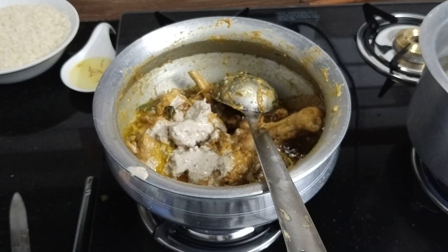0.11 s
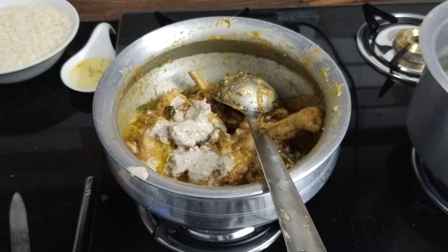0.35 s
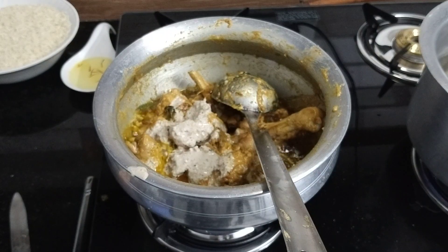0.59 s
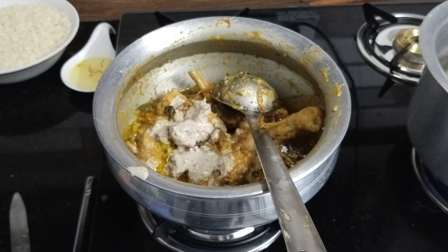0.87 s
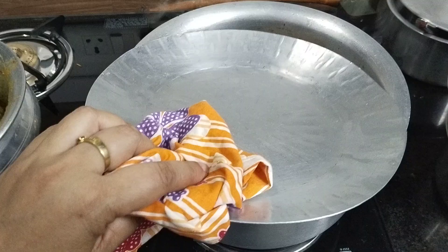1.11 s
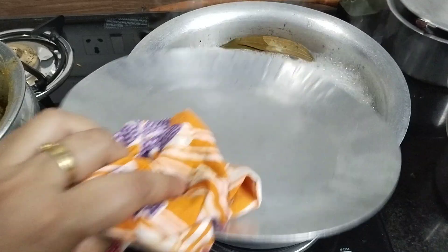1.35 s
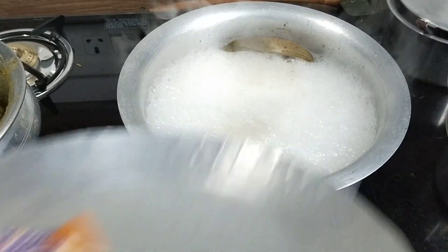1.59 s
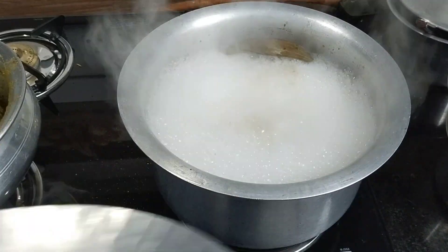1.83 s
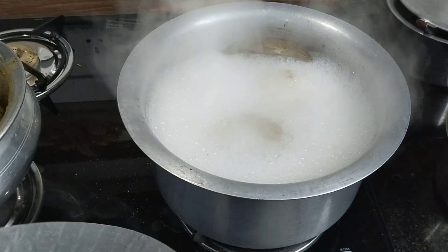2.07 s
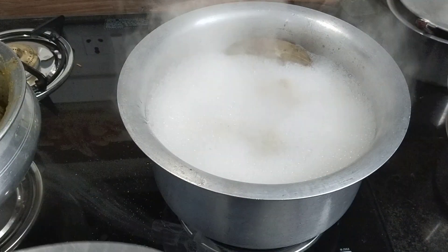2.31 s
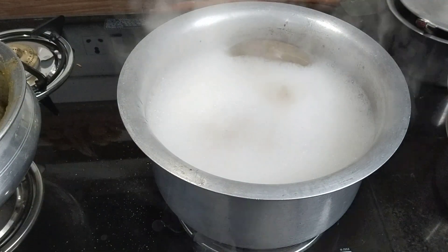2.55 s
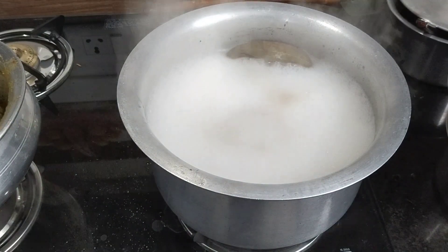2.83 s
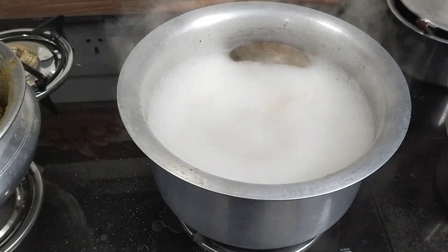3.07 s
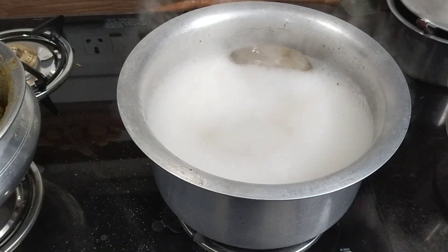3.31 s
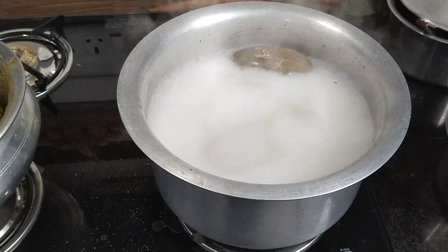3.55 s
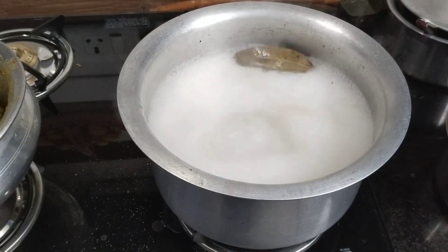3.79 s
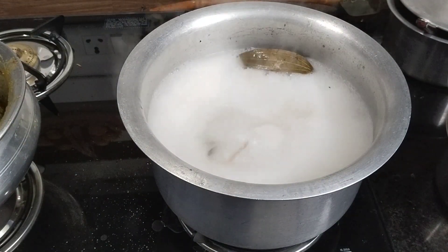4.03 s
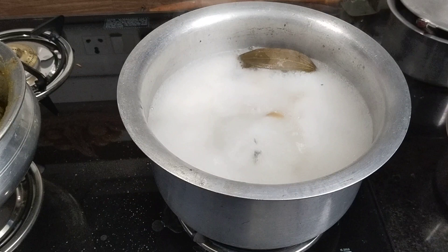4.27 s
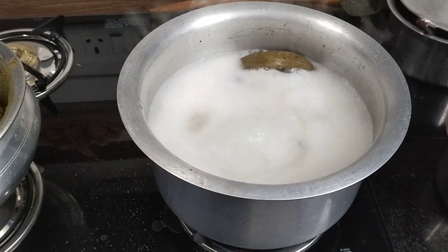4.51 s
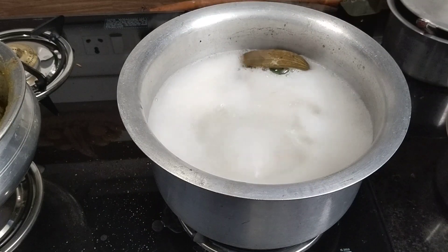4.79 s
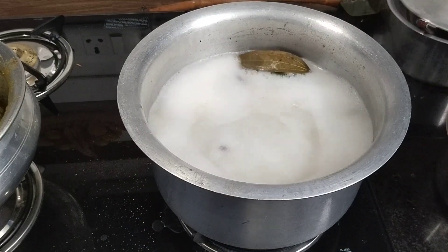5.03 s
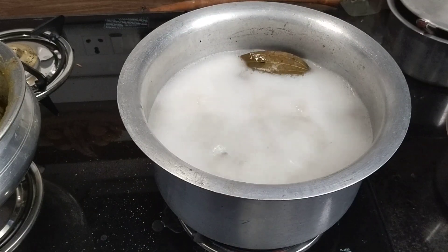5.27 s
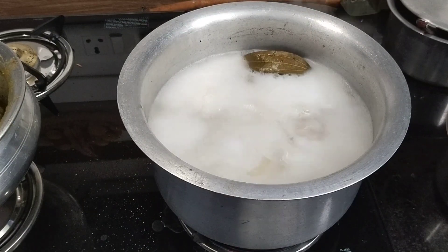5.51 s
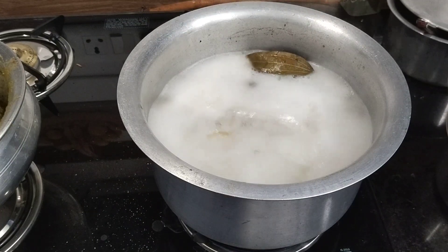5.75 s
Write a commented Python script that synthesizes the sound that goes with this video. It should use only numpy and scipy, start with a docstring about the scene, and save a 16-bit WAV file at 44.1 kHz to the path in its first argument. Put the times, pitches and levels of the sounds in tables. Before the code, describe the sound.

A close stereo microphone hears a quiet tiled kitchen with a short, bright reverberation. From 0 to 1.2 s, small wet plops, ticks and crackles rise in pitch from a simmering pot over faint flickering burner hiss and a wavering low hum. Around 1.2-1.7 s a thin aluminium lid drags off the rim, swelling into a hollow, gritty, ringing midrange scrape that peaks near 1.55 s. The boil then thins; a soft knock comes at 2.0 s, a bright clink at 2.26 s, and gentle brushes and ticks until 3.4 s. At 3.74-3.86 s the lid taps lightly on stone, then knocks sharply at 4.02 s. After a near pause, it drops at 4.75 s, by far the loudest moment, with repeated bright clanks and right-sided jolts to 4.9 s, sliding and ringing until about 5.2 s. A soft brush and small knock at 5.5 s close over faint hiss.

```python
"""Food plops in a simmering pot; then a thin aluminium lid is dragged off its rim, eased onto a stone counter,
knocked, dropped and slid, in a tiled kitchen. Ticks, knocks, a bright clink, burner hiss and a wavering hum
fill the pauses. The lid is grit clicks convolved with decaying plate modes; bubbles are short resonators, ticks
decaying sines, knocks and brushes shaped noise bursts, hiss noise in flickering bands, hum two sines.
Bubbles, ticks and lid ring in the room; hiss, hum, knocks, brushes and jolts are added dry."""
import sys
import numpy as np
from scipy import signal
from scipy.fft import rfft
from scipy.io import wavfile
from scipy.ndimage import uniform_filter1d

SR = 44100
rng = np.random.default_rng(int(sys.argv[2]) if len(sys.argv) > 2 else 0)


def waveform_to_disk(signal):
    """Save audio, clipped to [-1, 1], as 16-bit WAV at the path in sys.argv[1]."""
    frames = np.transpose(np.atleast_2d(signal))
    scaled = np.clip(frames, -1, 1) * 32767
    samples = np.round(scaled).astype(np.int16)
    wavfile.write(sys.argv[1], SR, samples)


def boost(x):
    """Linear amplitude factor 10**(x/20) for a level x in decibels (scalar or array-like)."""
    u = np.asarray(x, float) / 20
    return 10 ** u


N = 259308

# Left-right likeness of diffuse sound. Each row: frequency in Hz, likeness (1 = same on both sides).
LIKENESS = [(60, 0.91), (180, 1), (550, 0.45), (1650, 0.11), (4970, 0.093), (15000, 0.08)]
EDGES_HZ = 40 * 2 ** np.arange(0, 9.1, 0.5)  # half-octave bands
STOVE_LAG_S, COUNTER_LAG_S = 0.0001, 0.0004  # direct sound, left after right


def rms_one(x):
    """Scale to rms 1."""
    return x / np.sqrt(np.mean(x ** 2) + 1e-20)


def at_hz(points, hz):
    """Read a table on a log-frequency axis."""
    table_hz, values = np.array(points).T[:2]
    return np.interp(np.log(hz), np.log(table_hz), values)


def band(x, low_hz, high_hz):
    """Band-pass."""
    return signal.sosfilt(signal.butter(2, [low_hz, high_hz], "band", fs=SR, output="sos"), x)


def drift(rate_hz):
    """Slow random wander, rms 1: noise through two equal poles, one point per 40 samples."""
    r = np.exp(-80 * np.pi * rate_hz / SR)
    slow = signal.lfilter([1], [1, -2 * r, r * r], rng.standard_normal(N // 40 + 2002))[2000:]
    return np.interp(np.arange(N) / 40, np.arange(len(slow)), rms_one(slow))


def through(x, response):
    """Convolve each side with its response."""
    return signal.fftconvolve(np.atleast_2d(x), response, axes=1)[:, :N]


def stereo(mid, side, alike):
    """Mix two independent noises into left and right of a given likeness."""
    return np.sqrt(1 + alike) * mid + np.sqrt(1 - alike) * side * [[1], [-1]]


def kitchen(wet_db, left_lag_s):
    """Stereo room response: direct sound, later on the left, then a noise tail dying band by band."""
    # Each row: frequency in Hz, decay time t60 in s.
    room_t60 = [(150, 0.4), (1000, 0.62), (4000, 0.63), (14000, 0.36)]
    t = np.arange(SR * 3 // 4) / SR
    white = rng.standard_normal((2, 2, len(t)))
    tail = 0
    for k, (low, high) in enumerate(zip(EDGES_HZ, EDGES_HZ[1:])):
        decay = boost(-60 * t / at_hz(room_t60, np.sqrt(low * high)))
        tail = tail + band(white[k % 2], low, high) * decay
    tail *= np.clip(t / 0.0033, 0, 1)  # first reflections need a few ms
    response = boost(wet_db) * tail / np.sqrt(np.sum(tail ** 2) / 2)
    response[0, round(left_lag_s * SR)] += 1
    response[1, 0] += 1
    return response


def hum():
    """Mains hum at 100 Hz that swells and fades, and a steadier octave; both waver in pitch and level."""
    # Each row: middle in s, half length in s, nominal peak in dB.
    hum_swells = [(0.137, .2, -68), (0.64, 0.32, -73.5), (1.43, 0.28, -67), (1.92, 0.26, -79),
                  (2.456, .2, -72), (2.958, 0.14, -72), (3.342, 0.17, -69), (3.91, 0.26, -71),
                  (4.376, 0.15, -82), (5.804, 0.14, -74)]
    hum_hz, octave_db = 100, -75.5
    t = np.arange(N) / SR
    phase = 2 * np.pi * np.cumsum(hum_hz * (1 + 0.003 * drift(4))) / SR
    swell = sum(boost(db) * np.clip(1 - ((t - mid_s) / half_s) ** 2, 0, 1) for mid_s, half_s, db in hum_swells)
    fundamental = swell * boost(1.5 * drift(9)) * np.sin(phase)
    octave = boost(octave_db + 3 * drift(7)) * np.sin(2 * phase)
    return fundamental + octave


def air(patchy_db):
    """Burner hiss: half-octave noise bands flickering separately, levelled below and above a split; plus hum."""
    # Each row: time in s, rms in dB below the split, rms in dB above it (mean of both sides).
    air_levels = [(0.0, -65, -66), (0.8, -66, -64), (1.15, -64, -68), (1.95, -70, -63.5), (2.4, -64.5, -59),
                  (2.9, -67, -66.5), (3.7, -74.5, -67.5), (5.7, -67.5, -60), (5.88, -68.5, -66)]
    # Each row: frequency in Hz, relative band gain in dB.
    air_colour = [(40, -41.5), (70, -52.5), (100, -5), (140, -10.5), (200, -14), (300, -1), (480, -8.5),
                  (900, -14), (1800, -12.5), (3200, -10.5), (6000, -12.5), (8700, -13.5), (12000, -12.5),
                  (15800, -53.5)]
    split_hz = 2500
    s, *columns = np.transpose(air_levels)
    low_db, high_db = [np.interp(np.arange(N) / SR, s, c) for c in columns]
    halves, white = np.zeros((2, 2, N)), rng.standard_normal((2, 2, N))
    for k, (low, high) in enumerate(zip(EDGES_HZ, EDGES_HZ[1:])):
        mid, side = band(white[k % 2], low, high)
        hz = np.sqrt(low * high)
        alike = np.clip(at_hz(LIKENESS, hz), -1, 1)
        gain = boost(at_hz(air_colour, hz) + patchy_db * (1000 / hz) ** 0.09 * drift(20))
        halves[int(hz > split_hz)] += gain * stereo(mid, side, alike)
    low_hiss = boost(low_db) * rms_one(halves[0])
    high_hiss = boost(high_db + np.array([[0.8], [-0.8]])) * rms_one(halves[1])
    return low_hiss + high_hiss + hum()


def simmer():
    """Bubbles burst at random, each ringing a short resonator; at first their pitch climbs, then the boil thins."""
    # Each row: low Hz, high Hz, nominal bubbles per s, base level in dB, cycles per 60 dB of decay.
    bubbles = [(700, 1750, 70, -58, 22), (2400, 3600, 90, -64, 55)]
    first_pot_s, second_pot_db = 1.3, -6.5  # the second sounds the first row only
    climb_from, climb_by, pitch_scatter = 0.25, 0.45, 0.2  # shares of the pitch range
    t = np.arange(N) / SR
    out = np.zeros((2, N))
    first = t < first_pot_s
    for low_hz, high_hz, per_s, db, cycles in bubbles:
        boiling = np.where(first, 1, boost(second_pot_db) * (low_hz == bubbles[0][0]))
        sizes = boost(db + 4 * np.minimum(rng.exponential(1, N), 3)) * rng.choice([-1, 1], N)
        born = rng.random(N) < per_s * boost(4 * drift(6)) / SR
        climb = climb_from + climb_by * t / first_pot_s + pitch_scatter * rng.standard_normal(N)
        climbing = np.clip(10 * climb, 0, 9).astype(int)
        pitch = np.where(first, climbing, rng.integers(0, 10, N))
        for k, hz in enumerate(np.geomspace(low_hz, high_hz, 10)):
            r, w = boost(-60 * hz / cycles / SR), 2 * np.pi * hz / SR
            bursts = sizes * born * boiling * (pitch == k) + 1e-18
            ring = signal.lfilter([0, np.sin(w)], [1, -2 * r * np.cos(w), r * r], bursts)
            out += band(ring, 0.98 * hz, 1.093 * hz) * boost(rng.normal(0, 4.3, (2, 1)))
    return out


def ticks(room):
    """Plops, ticks and crackles: one decaying sine each, panned, heard in the room."""
    # Each row: start in s, dry level in dB before pan and decay, frequency in Hz, left over right in dB.
    tick_rows = [(0.029, -46, 2370, 6), (0.07, -52, 715, -1), (0.299, -50.5, 870, -2),
                 (0.3092, -46, 8200, 0), (0.346, -53, 821, 5), (0.358, -40.5, 3020, 3),
                 (0.396, -44.5, 1090, 3), (0.4284, -46, 5510, 8), (0.581, -38.5, 12400, 9),
                 (0.583, -52, 1260, 4), (0.625, -46.5, 1500, 4), (0.702, -48.5, 1410, 6),
                 (0.771, -41, 1310, 1), (0.891, -40.5, 7780, 1.5), (0.946, -45, 1480, 5),
                 (0.967, -44, 1310, 0), (0.9754, -41.5, 6400, 4), (1.776, -43, 4870, -3),
                 (2.211, -47, 1646, 2), (3.04, -44.5, 3260, 2), (3.206, -40.5, 6700, 3),
                 (3.3128, -42, 7800, -3), (3.3354, -45, 8700, -7), (3.412, -38.5, 8700, -4)]
    cycles = 21  # per 60 dB of decay
    out, t = np.zeros((2, N + SR)), np.arange(SR // 2) / SR
    for s, db, hz, pan_db in tick_rows:
        at = round(s * SR)
        ring = boost(db - 60 * t * hz / cycles) * np.sin(2 * np.pi * hz * t)
        out[:, at:at + len(t)] += ring * boost(np.array([[pan_db / 2], [-pan_db / 2]]))
    return through(out, room)


def knocks_and_brushes():
    """Knocks, a bright clink and soft brushes: band noise with a linear rise and an exponential decay."""
    # Each row: start in s, rms in dB before the envelope, low Hz, high Hz, decay t60 in s.
    knocks = [(1.984, -57, 790, 2960, 0.79), (2.261, -46.5, 2840, 12000, 0.45), (3.3, -48.5, 61, 107, 0.41),
              (2.44, -60, 706, 1160, 0.34), (3.739, -58.5, 80, 406, 1), (4.018, -49, 70, 404, 0.65),
              (5.486, -46, 322, 2450, 0.52)]
    # Each row: start in s, rms in dB before the envelope, low Hz, high Hz, rise in s.
    brushes = [(1.069, -50.5, 3260, 4600, 0.013), (2.6, -49, 597, 8300, 0.035),
               (2.827, -56, 600, 7710, 0.019), (3.313, -52, 246, 1230, 0.021),
               (3.416, -55.5, 1440, 1590, .01), (3.402, -53.5, 60, 413, .04),
               (5.248, -45, 118.5, 443, 0.031)]
    knock_rise_s, brush_t60_s = 0.0017, 0.3
    out, t = np.zeros((2, N)), np.arange(SR // 2) / SR
    rows = [(*row[:4], knock_rise_s, row[4]) for row in knocks] + [(*row, brush_t60_s) for row in brushes]
    for s, db, low_hz, high_hz, rise_s, t60_s in rows:
        at = round(s * SR)
        alike = np.clip(at_hz(LIKENESS, low_hz), 0, 1)
        sides = stereo(*rng.standard_normal((2, len(t))), alike)
        noise = rms_one(band(band(sides, low_hz, high_hz), low_hz, high_hz))
        burst = noise * boost(db - 60 * t / t60_s) * np.clip(t / rise_s, 0, 1)
        out[:, at:at + len(t)] += burst[:, :N - at]
    return out


def jolts():
    """Jolts through the counter into the right microphone: a quick push and a slower swing back, faint on the left."""
    # Each row: time of the push in s, nominal right-side peak in dB.
    jolt_rows = [(4.769, -14), (4.832, -21), (4.842, -11.5), (4.896, -25)]
    out, t = np.zeros(N), np.arange(SR // 50) / SR
    push = np.exp(-((t - 0.002) / 0.00044) ** 2)
    swing_back = 0.14 * np.exp(-((t - 0.0045) / 0.0015) ** 2)
    for s, db in jolt_rows:
        at = round((s - 0.002) * SR)
        out[at:at + len(t)] += boost(db) * (push - swing_back)
    return out * boost(np.array([[-25.0], [0.0]]))


def rubbing(strokes, per_s, grit_db, bump_db):
    """Grit catches in dense uneven clicks; bending and rasp force follow each stroke and stop outside it."""
    t = np.arange(N) / SR
    sizes = boost(grit_db * np.minimum(rng.exponential(1, N), 5)) * rng.choice([-1, 1], N)
    grit = rms_one(sizes * (rng.random(N) < per_s / SR)) * boost(bump_db * drift(34))
    force = np.zeros((2, N))
    for rows in strokes:
        s, *columns = np.transpose(rows)
        force += [boost(np.interp(t, s, c, -200, -200)) for c in columns]
    ease = np.exp(-1 / (0.002 * SR))  # contact builds over a few ms
    return grit * signal.lfilter([1 - ease], [1, -ease], force)


def lid_responses(room, spots):
    """Strong plate modes over many weak ones, radiated differently to each side; bending and rasp per contact."""
    # Strongest modes. Each row: frequency in Hz, t60 in s, then relative level in dB
    # dragged on the rim, eased down, knocked, slid.
    strong_modes = [(310, 0.14, -12, -16, -14, -24), (495, 0.14, -18, -18, -13, -20),
                    (614, 0.14, -8, -16, -24, -11), (659, 0.45, 3, 2, -7, 3),
                    (713, 0.14, -14, -12, -16, -15), (786, 0.14, -13, -20, -8, -19),
                    (1077, 0.14, -8, -17, -7, -18), (1157, 0.4, -8, -16, -10, -12),
                    (1332, 0.14, -16, -22, -18, -15), (1373, 0.14, -18, -22, -14, -16),
                    (1416, 0.14, -19, -18, -11, -17), (1696, 0.25, -19, -19, -8, -11),
                    (1787, 0.14, -21, -27, -12, -18), (1836, 0.14, -21, -24, -11, -21),
                    (1916, 0.14, -26, -23, -17, -8), (1968, 0.14, -25, -22, -22, -12),
                    (2030, 0.3, -16, -20, -15, -12), (2178, 0.14, -29, -20, -12, -15),
                    (2476, 0.25, -22, -21, -19, -16), (2533, 0.3, -23, -20, -12, -4),
                    (2705, 0.35, -14, -18, 2, -9), (2772, 0.25, -21, -13, -13, -9),
                    (3042, 0.14, -39, -21, -20, -12), (3510, 0.14, -23, -13, -19, -7),
                    (3674, 0.3, -19, -21, -19, -6), (4054, 0.14, -24, -18, -19, -14),
                    (4455, 0.14, -23, -16, -16, -15), (4538, 0.14, -25, -19, -22, -11),
                    (5206, 0.14, -26, -23, -10, -10), (5319, 0.14, -27, -17, -18, -5),
                    (5709, 0.14, -16, -21, -15, -16)]
    # Weak modes on the pot rim, then on stone. Each row: frequency in Hz, relative level in dB per Hz.
    on_rim = [(120, -42), (200, -16), (330, -11), (700, -4), (1200, -8), (1700, -17.5), (2300, -26.5),
              (3000, -27.5), (3600, -20), (5500, -25), (9000, -25), (13000, -28.5), (15500, -36)]
    on_stone = [(120, -33), (200, -39), (300, -29), (450, -29.5), (650, -3.5), (900, -26.5), (1600, -18.5),
                (2300, -18), (2600, -14), (3600, -12.5), (6000, -14.5), (9000, -17), (12500, -21),
                (15500, -24)]
    crossover_hz = 1500  # bending below, rasp above
    prominence_db = 5  # strong modes over weak
    t = np.arange(SR * 2 // 5) / SR
    strong_hz, strong_t60, *contacts_db = np.transpose(strong_modes)
    weak_hz = np.linspace(150, 15800, 300) + rng.uniform(-20, 20, 300)
    t60 = np.r_[strong_t60, 0.055 * (weak_hz / 1000) ** -0.1]
    hz = np.r_[strong_hz, weak_hz]
    turn = np.exp(np.outer(2j * np.pi * hz - np.log(1000) / t60, t).astype(np.complex64))
    # table levels are as heard in the room, so its gain at each mode is divided out
    bins = np.round(hz / SR * room.shape[1]).astype(int)
    room_power = np.mean(abs(rfft(room)) ** 2, axis=0)
    in_room = np.sqrt(uniform_filter1d(room_power, size=5)[bins])
    # a longer ring has a taller, thinner peak
    strong_offset_db = prominence_db + 14 * strong_t60 - 1.4 * np.log2(strong_hz / 660)
    shape = (spots, 2, len(hz))
    out = []
    for strong_db, sheet in zip(contacts_db, (on_rim, on_stone, on_stone, on_stone)):
        height = boost(np.r_[strong_db + strong_offset_db, at_hz(sheet, weak_hz)]) / t60 / in_room
        facing = boost(rng.normal(0, 1, shape)) * np.exp(0.8j * rng.standard_normal(shape))
        facing *= rng.choice([-1, 1], (spots, 1, len(hz)))  # each spot pushes each mode its own way
        # long waves reach both sides in step
        facing[:, 0] *= np.exp(2j * np.pi * hz * COUNTER_LAG_S * (hz < crossover_hz))
        parts = []
        for chosen in (hz < crossover_hz, hz >= crossover_hz):
            rings = ((height * facing * chosen).astype(np.complex64) @ turn).imag
            in_band = band(rings, 170, 16000)  # keep the lid's ring above 170 Hz
            heard = signal.fftconvolve(in_band, room[None], axes=2)
            parts.append(heard / np.sqrt(np.sum(heard ** 2) / 2 / spots))
        out.append(parts)
    return out


def lid(room, spots=3):
    """Lid dragged over the rim, eased onto stone, knocked, dropped and slid; grit catches at several spots."""
    # Strokes on the rim, then on the counter. Each row: time in s, bending in dB below the crossover,
    # rasp in dB above it.
    drag = [
        [(1.17, -65.5, -73), (1.38, -53.5, -51), (1.46, -41, -41), (1.55, -32, -40.5), (1.645, -40.5, -37.5),
         (1.71, -67, -110), (1.84, -65, -49)],
    ]
    slides = [
        [(3.74, -48, -42.5), (3.745, -49, -49), (3.86, -50.5, -46), (4.01, -53, -65)],
        [(4.015, -40.5, -15), (4.027, -34, -29), (4.085, -31.5, -37.5)],
        [(4.45, -91, -62.5), (4.74, -54, -50.5)],
        [(4.751, -25, -2.5), (4.757, -27.5, -16), (5.06, -29.5, -21), (5.15, -28, -27), (5.25, -42, -48.5),
         (5.32, -56, -43.5)],
    ]
    # Lid edge striking. Each row: time in s, relative rasp in dB, relative bending in dB.
    strikes = [(3.7404, -40, -41), (3.7873, -35, -50), (3.8287, -37, -52), (3.8604, -38, -53),
               (4.0163, -9, -33), (4.7556, -7, -28), (4.8194, -6, -26), (4.8944, -9, -26)]
    dragged = rubbing(drag, per_s=2000, grit_db=4.5, bump_db=3.5)
    eased = rubbing(slides[0::2], per_s=4000, grit_db=3, bump_db=1)
    knocked = rubbing(slides[1:2], per_s=3000, grit_db=3.5, bump_db=1.5)
    slid = rubbing(slides[3:], per_s=3000, grit_db=3, bump_db=1.2)
    struck = (eased, eased, eased, eased, knocked, slid, slid, slid)
    for (s, rasp_db, bend_db), contact in zip(strikes, struck):
        contact[:, round(s * SR)] += boost(np.array([bend_db + 27, rasp_db + 12]))
    spot, out = rng.integers(0, spots, N), 0
    for pushes, responses in zip((dragged, eased, knocked, slid), lid_responses(room, spots)):
        for push, response in zip(pushes, responses):
            out = out + sum(through(push * (spot == k), response[k]) for k in range(spots))
    return out


def scene():
    """Bubbles, ticks and lid ring in the room; hiss, hum, knocks, brushes and jolts are added dry."""
    counter = kitchen(wet_db=-2.0, left_lag_s=COUNTER_LAG_S)
    stove = kitchen(wet_db=0.5, left_lag_s=STOVE_LAG_S)
    background = air(patchy_db=3.0) + through(simmer(), stove)
    small_sounds = ticks(stove) + knocks_and_brushes()
    return background + small_sounds + jolts() + lid(counter)


def top_cut(x):
    """Nothing passes above the cut-off."""
    return signal.sosfilt(signal.butter(12, 16620, fs=SR, output="sos"), x)


def record(dry):
    """Resonance near 8.7 kHz, dip near 13.8 kHz, low cut, band limit at 16.5 kHz."""
    # Microphone port peak and dip. Each row: centre in Hz, width in Hz, gain in dB.
    port = [(8700, 590, 4.5), (13800, 1100, -23.5)]
    for hz, width_hz, db in port:
        dry = dry + (boost(db) - 1) * signal.lfilter(*signal.iirpeak(hz, hz / width_hz, SR), dry)
    low_cut = signal.sosfilt(signal.butter(2, 55, "high", fs=SR, output="sos"), dry)
    mix = signal.sosfilt(signal.cheby2(18, 60, 16500, fs=SR, output="sos"), low_cut)
    return top_cut(mix)


dry = scene()
out = record(dry)
waveform_to_disk(out)
```